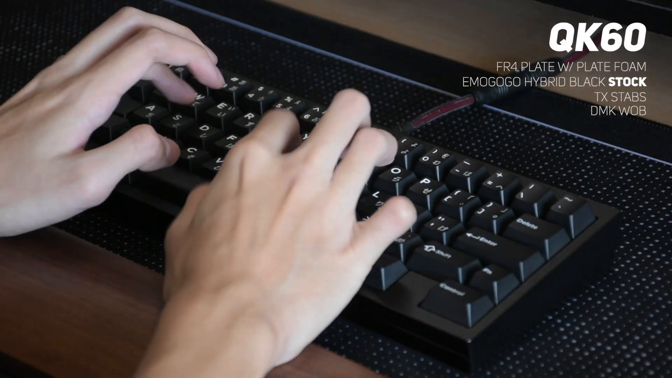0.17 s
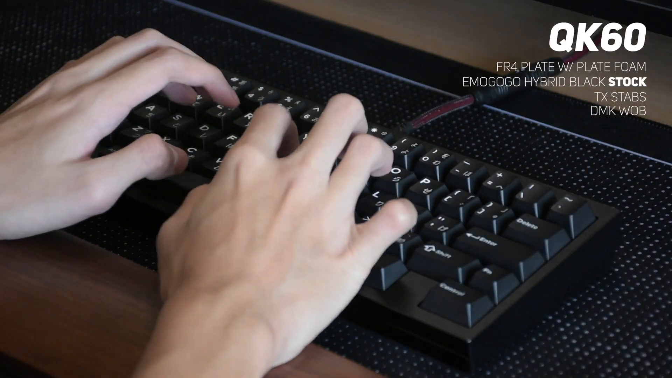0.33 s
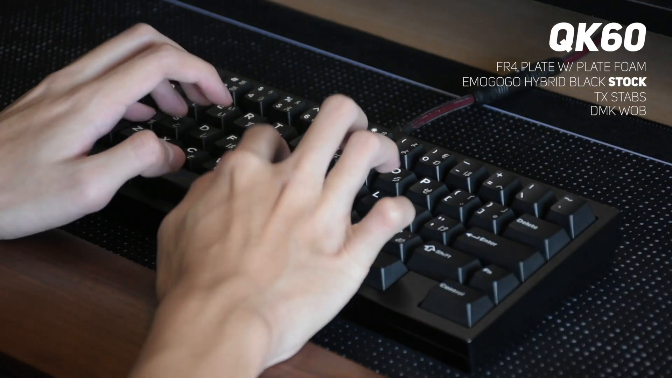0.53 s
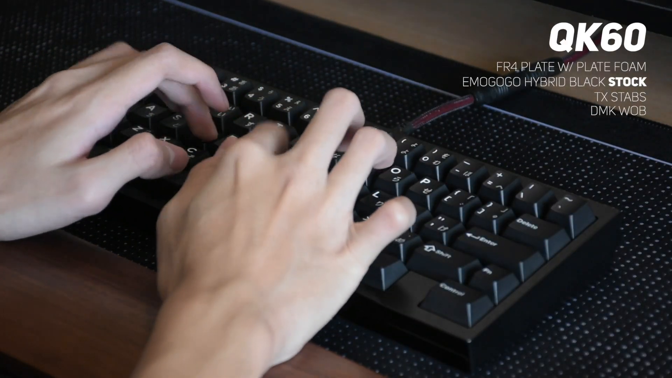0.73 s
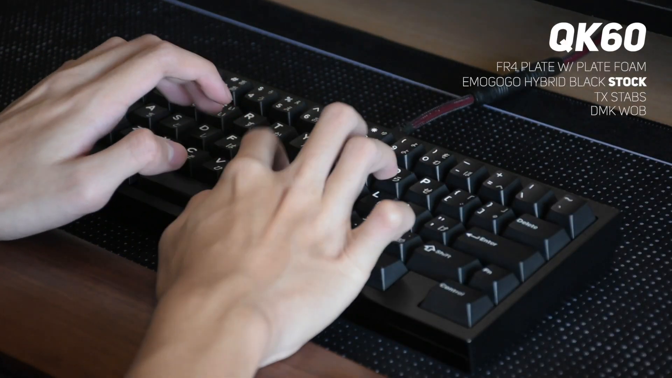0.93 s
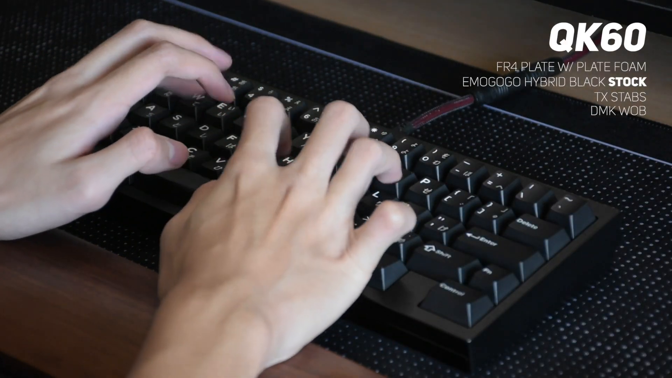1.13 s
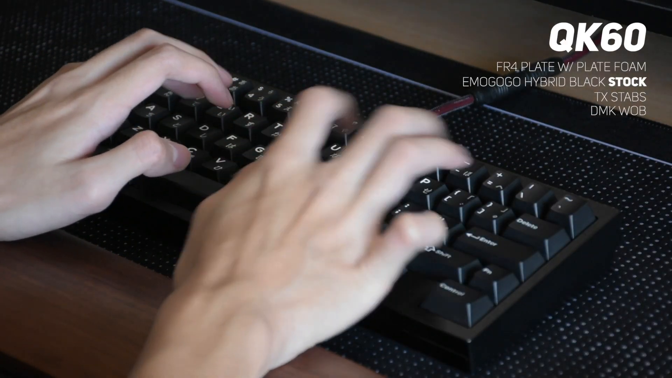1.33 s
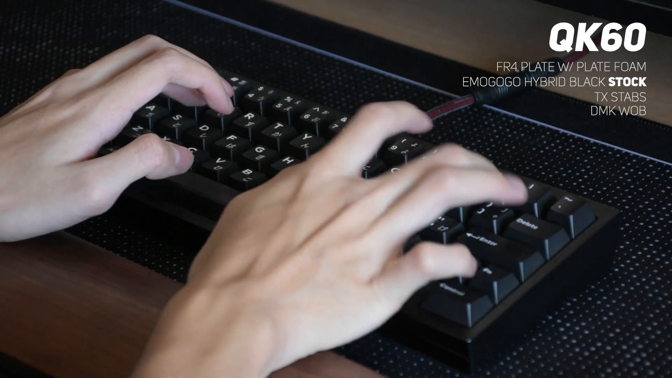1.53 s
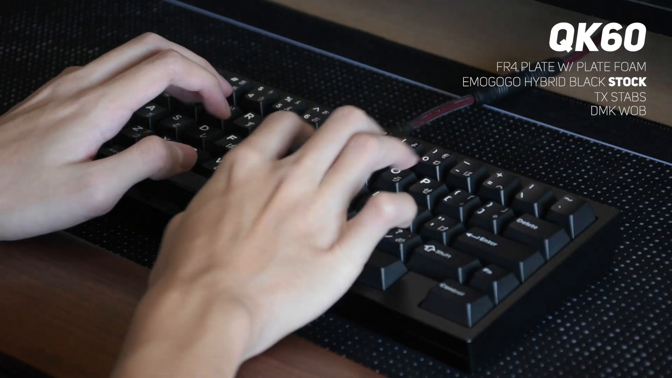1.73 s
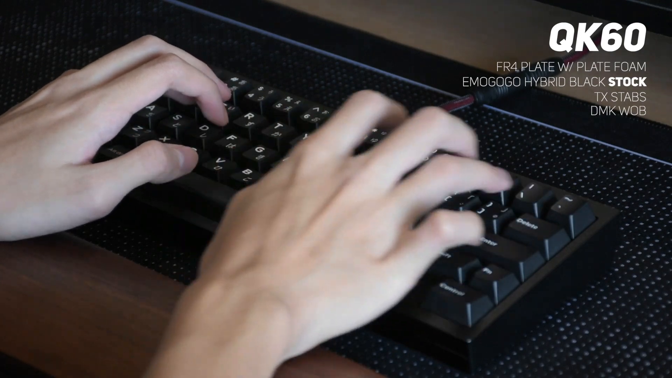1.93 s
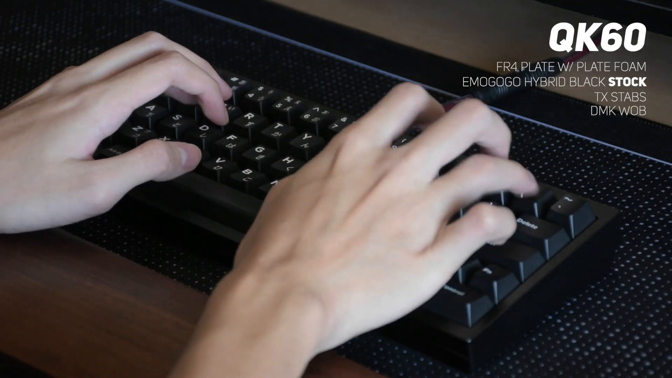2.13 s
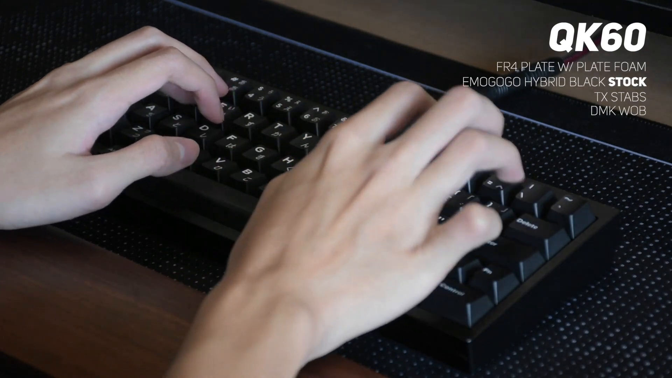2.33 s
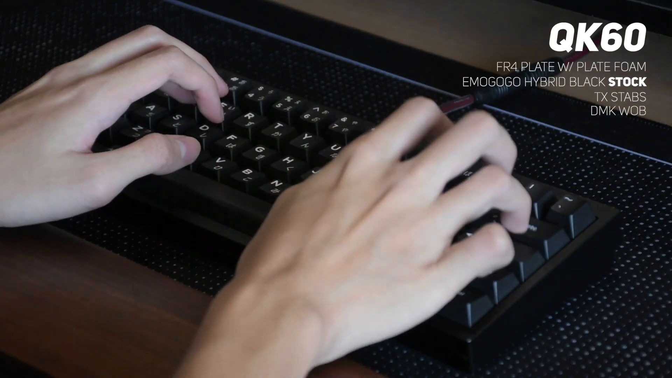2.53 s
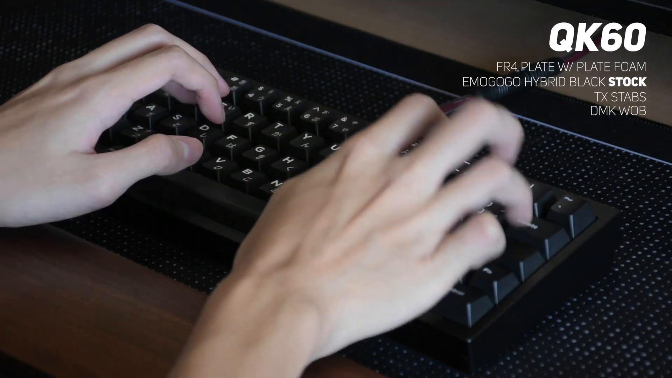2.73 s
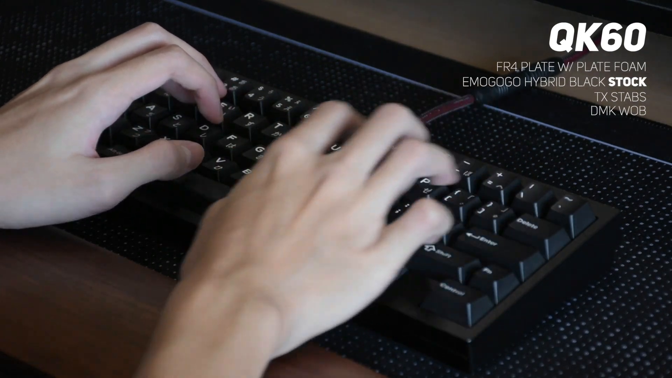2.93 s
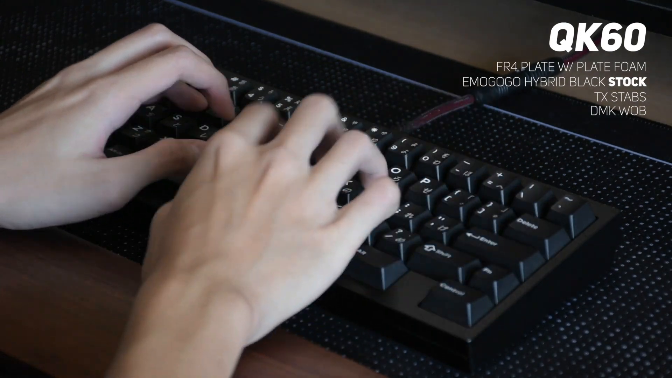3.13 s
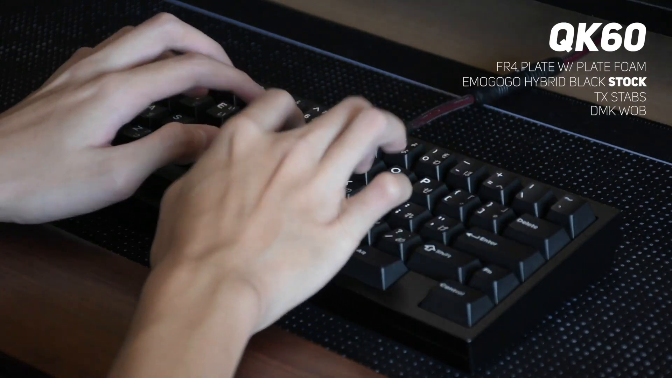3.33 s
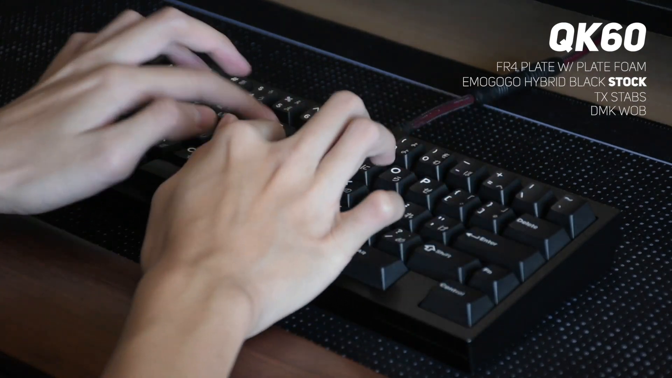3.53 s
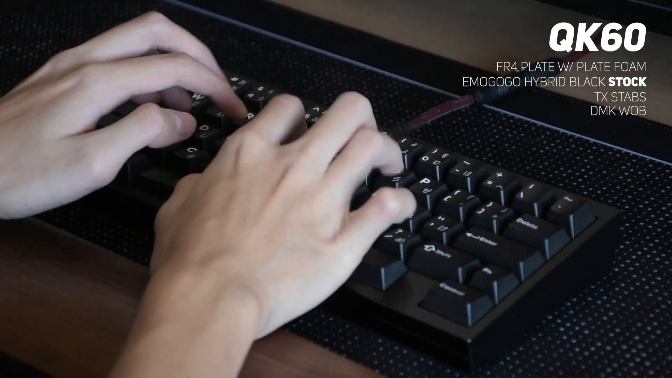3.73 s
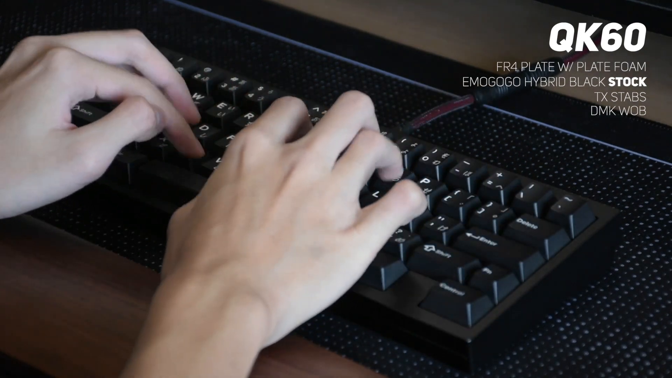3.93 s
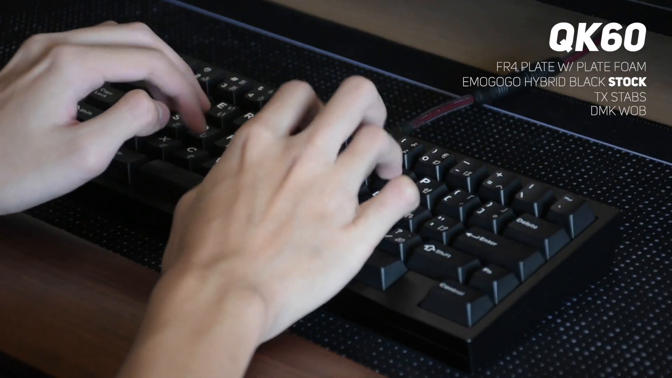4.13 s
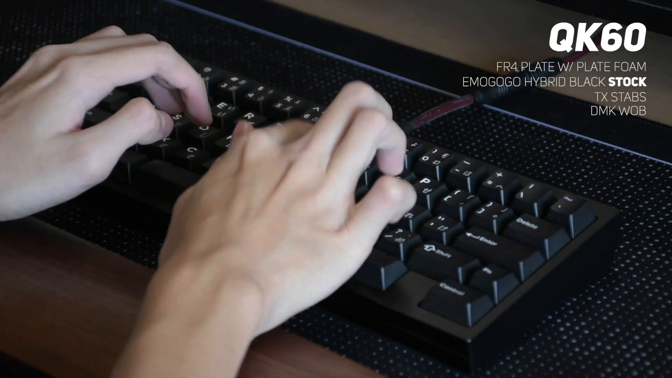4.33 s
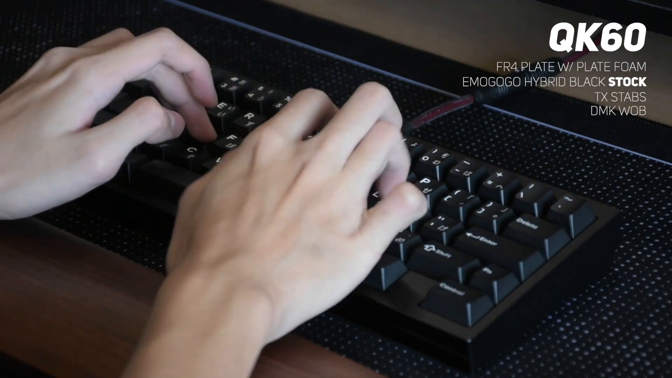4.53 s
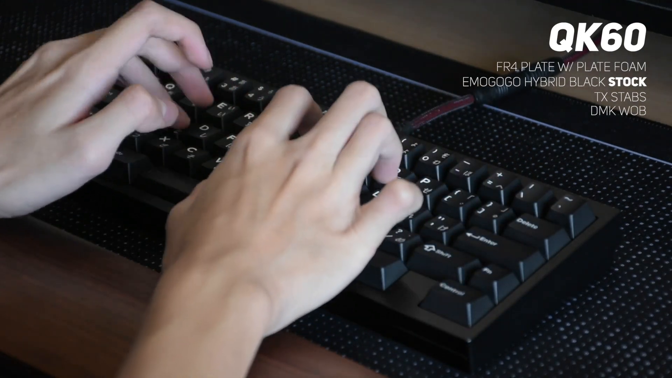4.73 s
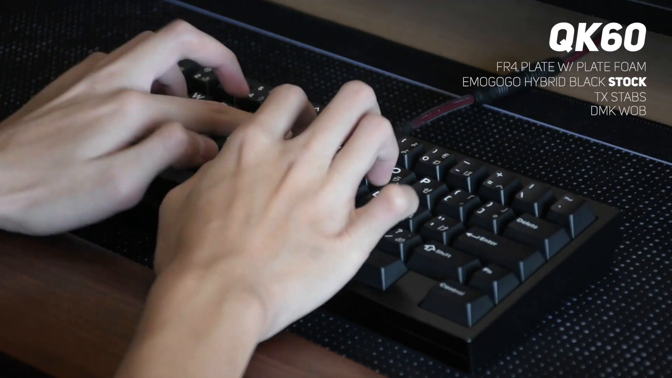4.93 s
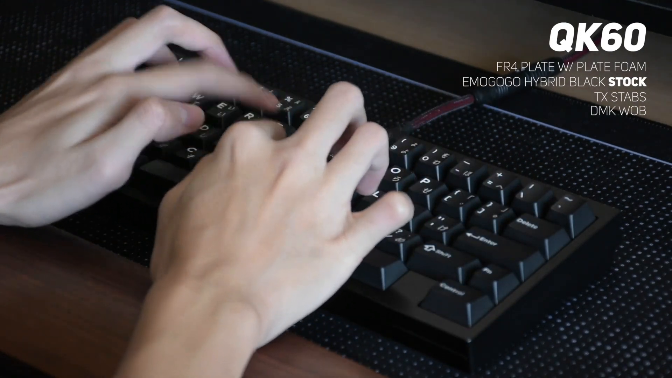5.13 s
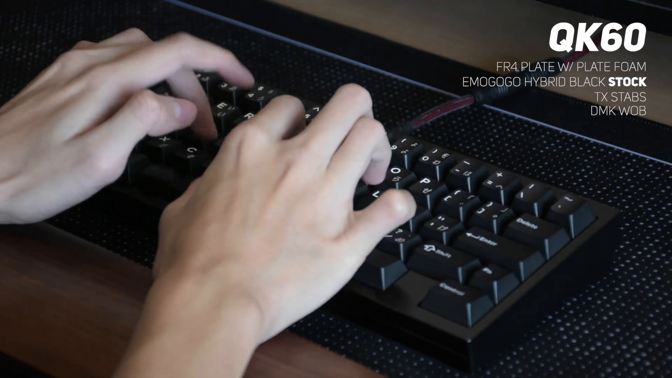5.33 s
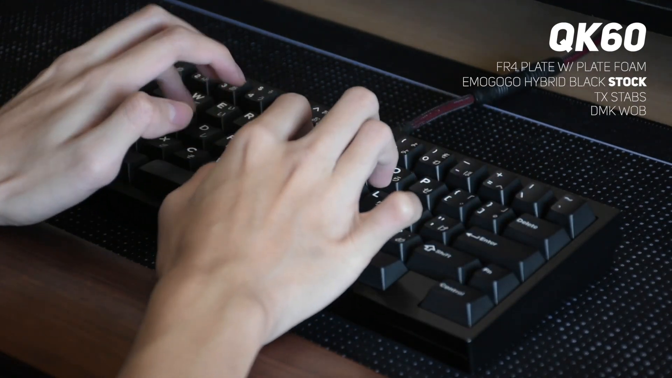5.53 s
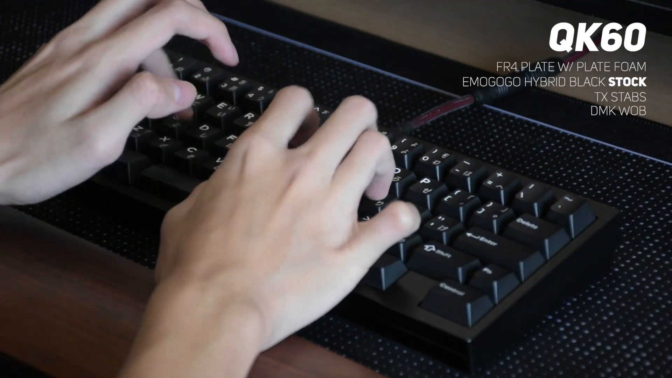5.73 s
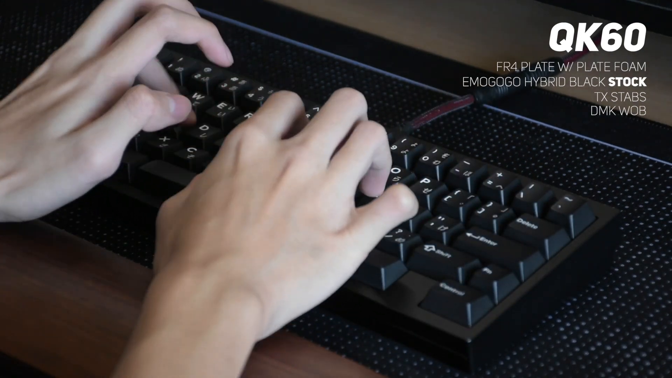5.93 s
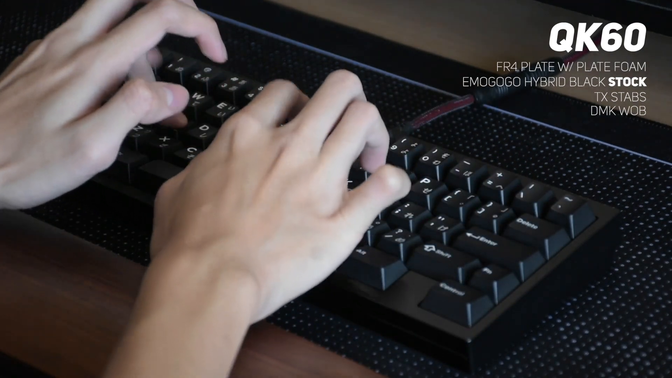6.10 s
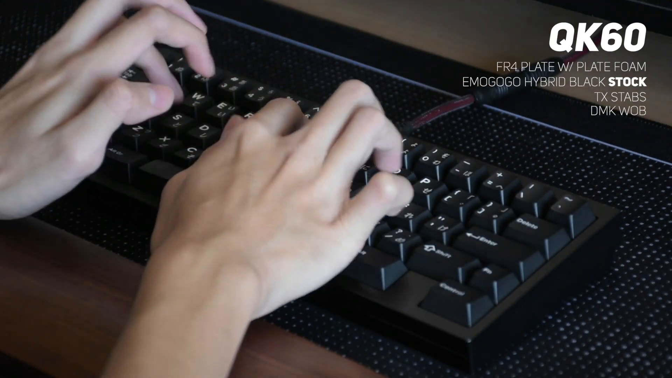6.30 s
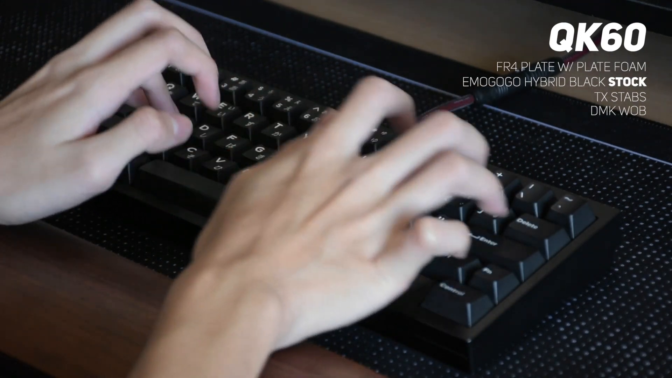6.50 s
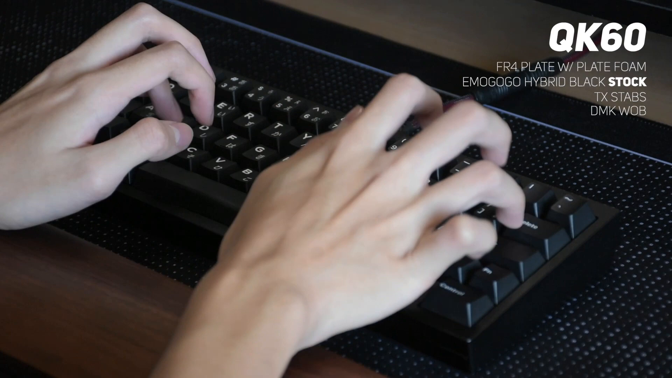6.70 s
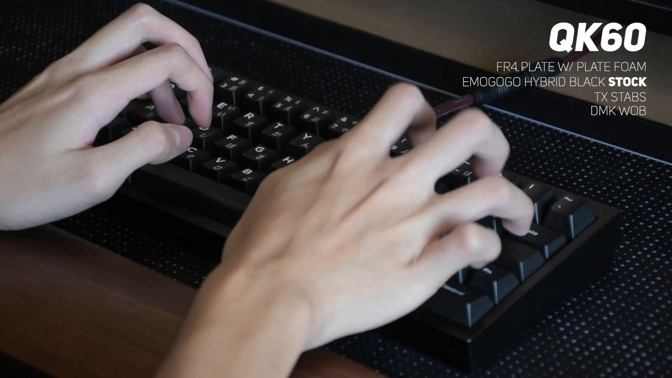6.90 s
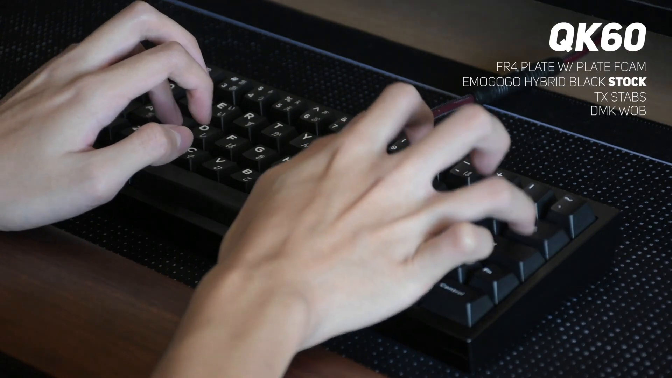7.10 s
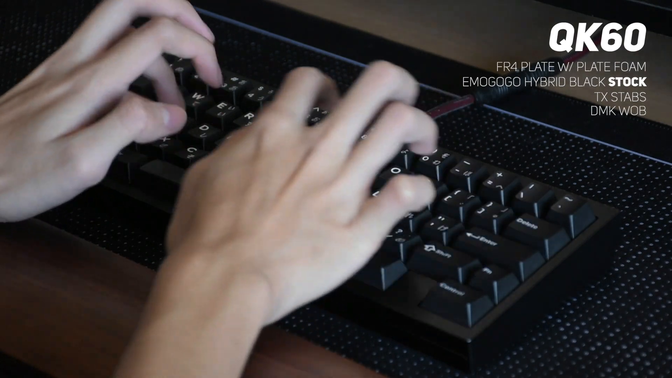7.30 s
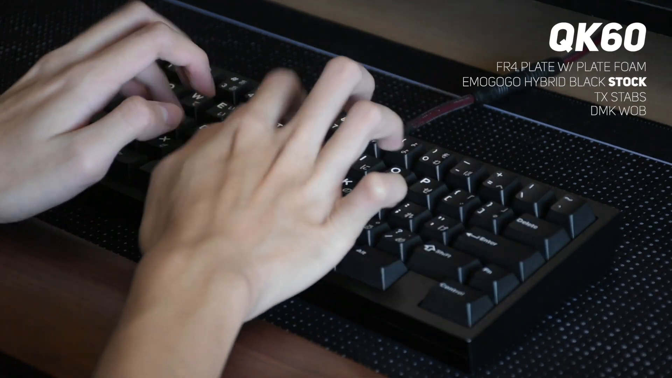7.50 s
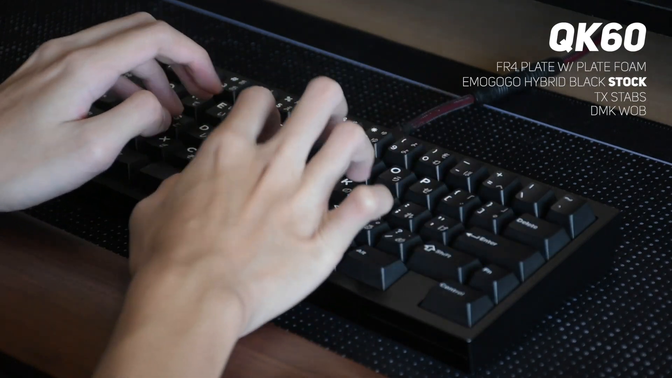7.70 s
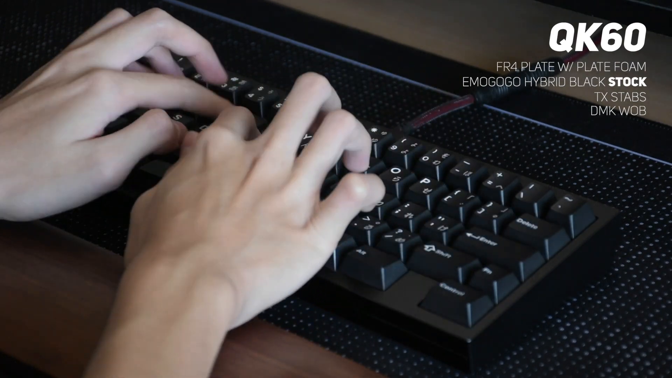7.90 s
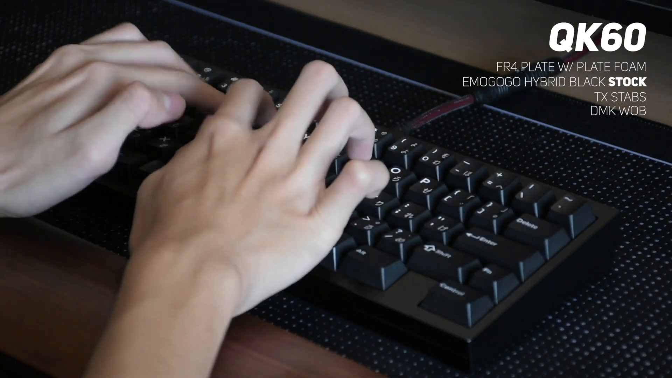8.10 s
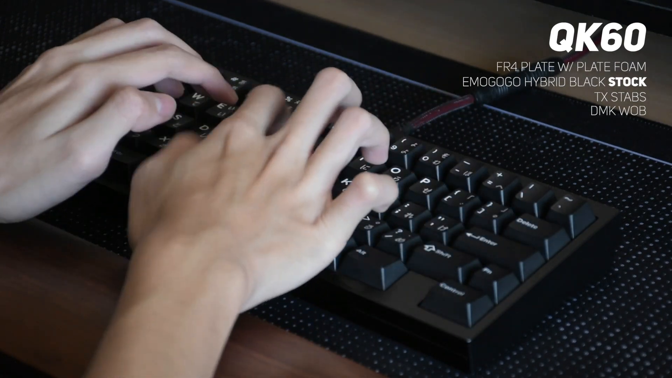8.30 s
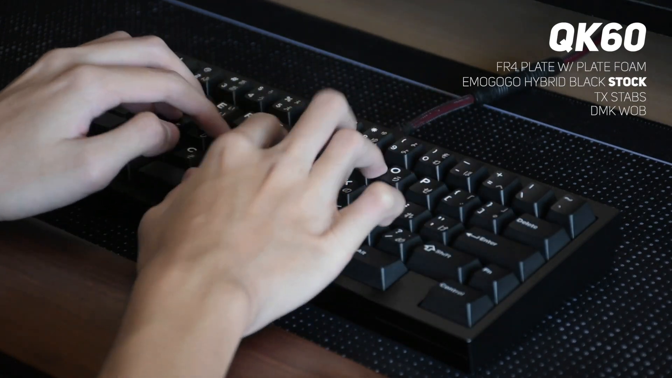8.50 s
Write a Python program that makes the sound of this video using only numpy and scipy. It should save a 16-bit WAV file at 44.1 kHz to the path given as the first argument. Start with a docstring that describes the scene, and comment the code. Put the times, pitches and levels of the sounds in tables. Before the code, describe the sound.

A mechanical keyboard on a matted wooden desk is typed on at close range. Each key gives a short dry clack with a hollow case knock and tiny switch tick, then a lighter return click. Rapid clusters alternate with brief gaps and evenly repeated, lower long-key taps. The space bar lands loudest and deepest. The desk hums softly under the blows, with a short room tail and barely audible air noise.

```python
"""Mechanical keyboard on a wooden desk

Someone types on a mechanical keyboard that lies on a mat, close to the microphone in a small quiet room.
Each key knocks when it bottoms out and when it springs back: the case thocks, the cap clacks, the switch ticks,
each a bank of ringing modes in a haze of noise. The long keys ring lower and hollower, fingertips pat the caps.
The desk's own modes thump and sway with a deep hum; a wall echo, a diffuse tail, hiss and a fan hum surround it."""
import sys
import numpy as np
from scipy import signal
from scipy.fft import rfft, irfft
from scipy.io import wavfile
from scipy.ndimage import uniform_filter1d

SR = 44100
rng = np.random.default_rng(int(sys.argv[2]) if len(sys.argv) > 2 else 0)


def transcribe(signal):
    """Save signal, clipped to [-1, 1], as a 16-bit WAV file at the path in sys.argv[1]."""
    frames = np.atleast_2d(signal).T
    limited = np.clip(frames, -1, 1)
    pcm = np.round(limited * 32767).astype(np.int16)
    wavfile.write(sys.argv[1], SR, pcm)


N = 377055


def from_db(db):
    """Decibels to gain."""
    return 10 ** (np.asarray(db) / 20)


def unit_energy(x):
    """Scale so that the squares sum to one."""
    return x / np.sqrt(np.sum(x ** 2) + 1e-20)


def low_pass(x, top_hz, order):
    """Causal low-pass."""
    return signal.sosfilt(signal.butter(order, top_hz, fs=SR, output="sos"), x)


def band(x, low_hz, high_hz, order=2):
    """Causal band-pass."""
    return signal.sosfilt(signal.butter(order, [low_hz, high_hz], "band", fs=SR, output="sos"), x)


def at_hz(points, hz, column=1):
    """Read a column of a table along log frequency."""
    points = np.array(points)
    return np.interp(np.log(np.maximum(hz, 1)), np.log(points[:, 0]), points[:, column])


def ring(clicks, hz, t60_s):
    """A damped resonance: a unit click sets a decaying sine of height 1 ringing."""
    radius = from_db(-60 / (t60_s * SR))
    angle = 2 * np.pi * hz / SR
    feedback = [1, -2 * radius * np.cos(angle), radius ** 2]
    return signal.lfilter([0, np.sin(angle)], feedback, clicks + 1e-18)


def add(out, start_s, sound):
    """Mix a sound in at a time."""
    start = max(round(start_s * SR), 0)
    out[start:start + len(sound)] += sound[:N - start]


# a usual letter stroke; the case's thock grows a little more slowly than the clack (dB per dB)
USUAL_CLACK_DB, USUAL_THOCK_DB, THOCK_FOLLOWS = -20, -33, 0.72
# a light touch on a cap: its tick relative to its clack, and its pitch
TOUCH_TICK_DB, TOUCH_HZ = -17.5, 2720
# centre modes of a letter key, relative levels: pitch_hz [Hz], level_db [dB], t60_s [s]
LETTER_MODES = [(720, -16.5, 0.01), (1092, 9, 0.009), (1360, 3.5, 0.025), (1550, 7.5, 0.012),
                (2130, -9, 0.0033), (2380, 35.5, 0.0086), (2795, 28, 0.0098), (2800, -10.5, 0.017),
                (3500, -44, .006), (6660, -6, 0.0022), (9200, 16, 0.0004), (10320, 5, 0.0011),
                (13200, -23, 0.0039)]
# letter key contacts: landings, springbacks, and the louder touches of fingers meeting a cap just before a
# stroke: start_s [s], clack_db [dB energy], tick_db [dB energy], pitch_hz [Hz]
LETTER_HITS = [(0.0709, -29, -54, 2610), (0.0875, -13.5, -26, 2730), (0.1844, -22, -36.5, 2820),
               (0.1864, -28.5, -43, 2640), (0.4712, -34.5, -50, 2900), (0.4872, -17, -34, 2650),
               (0.5912, -19, -39, 2670), (0.6714, -39, -45, 3000), (0.7095, -23, -44.5, 2580),
               (0.7169, -28, -49, 2720), (0.7817, -33, -42.5, 2720), (0.8063, -21, -38, 2630),
               (0.8104, -21, -38, 2580), (0.9117, -19.5, -39, 2660), (0.9825, -28.5, -42, 3200),
               (0.9979, -14, -29.5, 2720), (1.0723, -34, -53, 2760), (1.1157, -16, -34, 2540),
               (1.3356, -38.5, -63, 2800), (3.0824, -32, -55, 2660), (3.1506, -36, -54, 3020),
               (3.1814, -15.5, -41.5, 2630), (3.27, -31, -53, 2660), (3.2792, -34, -51, 2730),
               (3.2931, -14, -34, 2450), (3.3833, -17.5, -38.5, 2400), (3.3862, -20.5, -48, 2670),
               (3.4643, -34, -51, 2770), (3.482, -28, -52, 2510), (3.5516, -20.5, -37, 2640),
               (3.5609, -13.5, -31, 2950), (3.6712, -31, -40.5, 2720), (3.6746, -24.5, -48, 2840),
               (4.0194, -16.5, -41, 2680), (4.0923, -13.5, -34.5, 2570), (4.1097, -24.5, -41, 2540),
               (4.171, -17.5, -37.5, 2650), (4.322, -4, -25.5, 2710), (4.4178, -28, -43.5, 2630),
               (4.4702, -37, -50, 2640), (4.4929, -31, -58, 2580), (4.5711, -24, -40.5, 2630),
               (4.5901, -17.5, -41, 2650), (4.6743, -28, -42, 2500), (4.7868, -17.5, -44.5, 2610),
               (4.9352, -21.5, -46, 2560), (4.9722, -30, -44, 2640), (4.982, -11.5, -32.5, 2650),
               (5.0842, -21, -39.5, 2710), (5.1348, -23, -51, 2640), (5.184, -34.5, -40, 3050),
               (5.2096, -23, -48, 2630), (5.3015, -21.5, -41, 2650), (5.3043, -34, -41.5, 2690),
               (5.3279, -19, -45, 2580), (5.4937, -29, -38, 2730), (5.5195, -17.5, -33, 2820),
               (5.635, -14, -28.5, 2640), (5.6531, -17.5, -35, 2370), (5.7743, -22, -48, 2570),
               (5.9414, -31.5, -43, 2350), (6.0072, -26, -46, 2470), (6.0147, -22, -45, 2280),
               (6.2267, -25.5, -40, 2380), (6.2503, -17.5, -32.5, 2650), (6.3616, -31, -48, 2540),
               (6.3831, -20.5, -39.5, 2550), (7.1572, -17, -42.5, 2450), (7.1937, -31.5, -41, 2780),
               (7.2247, -18, -33, 2650), (7.2851, -28.5, -49, 2380), (7.3611, -29, -51, 2670),
               (7.4393, -9.5, -31.5, 2530), (7.5039, -13, -31, 2550), (7.8833, -32.5, -47, 3030),
               (7.8966, -18, -40, 2560), (7.9729, -26.5, -50, 2660), (8.0047, -7, -24, 2470),
               (8.1176, -28, -43.5, 2420), (8.1603, -24, -48, 2530), (8.2123, -20, -36, 2580),
               (8.3, -22.5, -42, 2580), (8.4987, -23.5, -42, 2620), (8.5013, -24, -48, 2890)]
# a finger meets or leaves a cap without pressing it home: start_s [s], clack_db [dB energy]
TOUCHES = [(0.569, -37), (1.47, -39), (2.061, -49), (2.215, -41), (4.312, -46), (4.559, -37.5),
           (5.382, -39.5), (5.613, -37.5), (5.902, -42.5), (5.911, -47), (6.05, -43), (7.057, -45.5),
           (7.43, -32), (7.552, -42), (7.609, -36.5), (7.997, -30.5), (8.125, -38)]


def letter_keys():
    """Letter strokes and light touches: the case answers each in step with its clack."""
    touches = [(s, clack_db, clack_db + TOUCH_TICK_DB, TOUCH_HZ) for s, clack_db in TOUCHES]
    contacts = []
    for s, clack_db, tick_db, pitch_hz in [*LETTER_HITS, *touches]:
        thock_db = USUAL_THOCK_DB + THOCK_FOLLOWS * (clack_db - USUAL_CLACK_DB)
        contacts.append((s, thock_db, clack_db, tick_db, pitch_hz))
    return contacts, keys(contacts, LETTER_MODES, far_end=0.25)


# centre modes of the space bar, relative levels: pitch_hz [Hz], level_db [dB], t60_s [s]
SPACE_MODES = [(396, -13.5, 0.019), (940, -20, 0.0099), (1253, -1.5, 0.012), (1457, 2.5, 0.013),
               (1550, -5, 0.0095), (1840, -14, 0.029), (2540, 14.5, 0.014), (2720, 2.5, 0.031),
               (3100, 17.5, 0.0067), (3520, 1, 0.019), (6730, 0.5, 0.01), (8350, -18, 0.0097),
               (9760, -4.5, 0.009), (12000, 0, 0.0077)]
# space bar landing and springing back: start_s [s], thock_db [dB energy], clack_db [dB energy]
SPACE_HITS = [(0.2463, -16, -24.5), (0.3891, -46.5, -67), (0.9532, -36, -54), (3.7434, -15, -24.5),
              (3.9068, -46.5, -55), (4.7162, -15, -21.5), (4.8757, -34, -45), (5.4118, -20, -37),
              (5.4154, -31.5, -26), (5.5481, -33, -49), (5.8125, -28.5, -59), (5.9873, -40, -40.5),
              (7.627, -10, -15.5), (7.7531, -27.5, -35), (8.3796, -16, -24)]


def space_bar():
    """The space bar's contacts excite its own set of long-key modes."""
    contacts = long_key_contacts(SPACE_HITS, tick_db=-16.5, pitch_hz=2650)
    return contacts, keys(contacts, SPACE_MODES, far_end=0.43)


# centre modes of the backspace key, relative levels: pitch_hz [Hz], level_db [dB], t60_s [s]
BACKSPACE_MODES = [(922, 5, 0.023), (1170, -2, 0.055), (1450, 17.5, 0.017), (1630, 9, 0.015),
                   (2450, 3, 0.011), (2620, -7, 0.0061), (3200, -3, 0.006), (3700, -13, 0.0021),
                   (6240, -7, 0.0032), (6980, -4, 0.011), (7870, -9.5, 0.014), (13100, -10.5, .004)]
# contacts of the backspace key: start_s [s], thock_db [dB energy], clack_db [dB energy]
BACKSPACE_HITS = [(2.4536, -18.5, -10.5), (2.5277, -27.5, -28.5), (2.5314, -33.5, -47),
                  (2.6211, -28.5, -21.5), (2.6817, -27, -29.5), (2.722, -24.5, -17), (2.7791, -22, -23.5),
                  (6.6044, -45.5, -45.5), (6.6414, -25.5, -21), (6.7135, -30.5, -38),
                  (6.7157, -39.5, -35.5), (6.8008, -38.5, -33.5), (6.8549, -32.5, -34),
                  (6.9197, -26, -21.5), (7.0035, -30.5, -35.5), (7.0056, -42, -49), (7.0787, -29, -22),
                  (7.1408, -29, -33), (7.1428, -37, -32)]


def backspace_key():
    """The backspace key's contacts excite its own set of long-key modes."""
    contacts = long_key_contacts(BACKSPACE_HITS, tick_db=-9.0, pitch_hz=2640)
    return contacts, keys(contacts, BACKSPACE_MODES, far_end=0.4)


# centre modes of the enter key, relative levels: pitch_hz [Hz], level_db [dB], t60_s [s]
ENTER_MODES = [(840, -7, 0.009), (1130, -7, 0.0084), (1510, -3.5, 0.021), (1650, -2.5, 0.028),
               (2230, 6, 0.03), (2580, 12, 0.0061), (3020, 20.5, 0.01), (3340, -50, 0.01), (5970, 1, .006),
               (7000, -4, 0.0064), (8000, 3, 0.007), (12040, 13.5, 0.0064)]
# contacts of the enter key: start_s [s], thock_db [dB energy], clack_db [dB energy]
ENTER_HITS = [(1.4813, -24, -18.5), (1.5026, -34, -37), (1.5481, -19.5, -18.5), (1.5775, -40.5, -39),
              (2.0954, -33.5, -28), (2.1529, -37, -31), (2.2612, -39.5, -34.5)]


def enter_key():
    """The enter key's contacts excite its own set of long-key modes."""
    contacts = long_key_contacts(ENTER_HITS, tick_db=-8.5, pitch_hz=2720)
    return contacts, keys(contacts, ENTER_MODES, far_end=0.98)


def long_key_contacts(hits, tick_db, pitch_hz):
    """A long key keeps one pitch setting, and its switch ticks in step with thock and clack."""
    return [(s, thock_db, clack_db, (thock_db + clack_db) / 2 + tick_db, pitch_hz)
            for s, thock_db, clack_db in hits]


CAP_PITCH_HZ = 2630  # reference for the clack pitch of each contact
DETUNE, SPREAD_DB = .015, 2.5  # scatter of the modes at each contact: relative pitch, strength in dB
BLUR_LAG_S = .006  # the sound spreads through the case before it leaves on all sides
# the three voices of a key, case, cap and switch: low_hz [Hz], high_hz [Hz]
VOICES = [(280, 1950), (1950, 4250), (5600, 14000)]
# where the many small modes of case, cap and switch lie: low_hz [Hz], high_hz [Hz]
HAZE_BANDS = [(950, 2890), (2150, 3170), (6000, 8350)]
# haze in the all-round sound, one value each for case, cap and switch: level_db [dB]
ALL_ROUND_HAZE_DB = (3.5, -5, -40)


def keys(contacts, modes, far_end, haze_db=(-12.0, -10.0, -4.0), haze_t60_s=(.03, .016, .014),
         slide_db=(-37.0, -34.0, -28.0), slide_s=0.02):
    """Each contact rings the key's main modes and a haze of small ones; returns forward and all-round sound."""
    forward, all_round = np.zeros((2, N))
    mode_hz, mode_db, mode_t60_s = np.transpose(modes)
    for s, *levels_db, pitch_hz in contacts:
        clack_db = levels_db[1]
        force = contact_force(rebound(clack_db), far_end)
        push = np.diff(force, prepend=0)  # small parts radiate their acceleration
        t = np.arange(len(push)) / SR
        hz = mode_hz * (1 + DETUNE * rng.standard_normal(len(modes)))
        strength = mode_strengths(mode_hz, mode_db, clack_db)
        friction = 2 * rng.random()  # some strokes rub more than others
        tunings = (1, pitch_hz / CAP_PITCH_HZ, 1)  # only the cap's modes follow the contact's pitch
        for v, (low_hz, high_hz) in enumerate(VOICES):
            own = np.flatnonzero((mode_hz >= low_hz) & (mode_hz < high_hz))
            main = sum(strength[k] * ring(push, hz[k] * tunings[v], mode_t60_s[k]) for k in own)
            main = unit_energy(band(main, low_hz, high_hz, order=3))

            grain, rub = rng.standard_normal((2, len(t)))
            grain = grain * from_db(-60 * t / haze_t60_s[v])
            rub = rub * np.exp(-(2 * t / slide_s - 1) ** 4)
            click = t == 0
            haze, slide, blur = map(unit_energy, band([grain, rub, click], *HAZE_BANDS[v]))

            gain = from_db(levels_db[v])
            # the stem slides before it lands
            add(forward, s - slide_s, gain * friction * from_db(slide_db[v]) * slide)
            add(forward, s, gain * unit_energy(main + from_db(haze_db[v]) * haze))
            # summed over all directions, the modes blur into a broad band
            add(all_round, s, gain * main / 2)
            add(all_round, s + BLUR_LAG_S, gain * from_db(ALL_ROUND_HAZE_DB[v]) * blur / 2)
    return forward, all_round


def mode_strengths(mode_hz, mode_db, clack_db, brighten=0.06):
    """Each contact excites the modes differently; hard blows favour the higher modes of the cap."""
    hardness = max(clack_db + 30.0, 0)
    cap_top_hz = VOICES[1][1]  # the tilt rises no further above this
    tilt = (np.minimum(mode_hz, cap_top_hz) / CAP_PITCH_HZ) ** (brighten * hardness)
    scattered_db = mode_db + SPREAD_DB * rng.standard_normal(len(mode_hz))
    return tilt * from_db(scattered_db) / mode_hz


def contact_force(rebound_db, far_end, rebound_s=(.0016, .004), far_end_s=(.0007, .0011), size=2048):
    """Force of one contact: a sharp knock and a rebound; the far edge of the cap lands just after."""
    force = np.zeros(size)
    force[0] = 1
    force[int(SR * np.interp(rng.random(), [0, 1], far_end_s))] += far_end * rng.random()
    force[int(SR * np.interp(rng.random(), [0, 1], rebound_s))] += from_db(rebound_db)
    return force


# rebound of a usual stroke, its fall (dB per dB of clack) and its scatter
REBOUND_DB, REBOUND_FALL, REBOUND_SPREAD_DB = -14, 0.58, 3.5


def rebound(clack_db):
    """Rebound strength in dB: soft contacts chatter, hard ones land clean."""
    usual_db = REBOUND_DB - REBOUND_FALL * (clack_db - USUAL_CLACK_DB)
    return min(usual_db + REBOUND_SPREAD_DB * rng.standard_normal(), 0)


# fingertips settling softly on the caps: start_s [s], level_db [dB peak, before the common trim]
PATS = [(0.153, -56), (3.947, -59.5), (3.995, -59), (4.144, -58), (4.387, -62), (4.534, -68), (4.581, -57),
        (5.259, -55.5), (7.207, -58)]


def pats(low_hz=250, high_hz=900, fade_s=0.0041, trim_db=-0.5, size=1024):
    """Soft skin gives only a short dull knock: a fading burst of band-passed noise."""
    out, t = np.zeros(N), np.arange(size) / SR
    for s, level_db in PATS:
        knock = band(rng.standard_normal(size) * np.exp(-t / fade_s), low_hz, high_hz, order=1)
        add(out, s, from_db(level_db + trim_db) * knock / np.max(np.abs(knock)))
    return out


SWAY_TOP_HZ = 66  # the sway stays below this
# level of the desk's sway under the hands, before the swell: start_s [s], level_db [dB]
SWAY = [(0.0, -45.5), (0.38, -45), (0.43, -42), (0.6, -42.5), (1.33, -46), (1.4, -55), (2.24, -51.5),
        (2.28, -47.5), (2.43, -55.5), (2.52, -36.5), (2.57, -44.5), (3.26, -48), (3.31, -43), (4.02, -42.5),
        (4.05, -40.5), (5.12, -48), (6.0, -43.5), (6.05, -53.5), (6.31, -40), (6.36, -49), (7.26, -42.5),
        (7.33, -52), (7.74, -37), (7.88, -56), (7.95, -41), (8.38, -50.5), (8.45, -45.5), (8.55, -64)]
# two desk modes that beat against each other, relative levels: pitch_hz [Hz], level_db [dB], t60_s [s]
SWAY_MODES = [(54.25, -1.5, 0.48), (59.64, 0, 0.7)]
# other desk modes that each keystroke thumps: pitch_hz [Hz], level_db [dB], t60_s [s]
DESK_MODES = [(36, -69.5, 0.12), (103.2, -66, 0.3), (124.8, -63.5, 0.17)]


def desk(contacts, soft_hz=170, stir=0.015, sway_hz=(50, 65), run_in_size=22050):
    """Keystrokes thump the desk; two modes beat, and swell and sink with the weight of the hands."""
    blows = np.zeros(N)
    for s, thock_db, *_ in contacts:
        blows[round(s * SR)] += from_db(0.68 * (thock_db + 30.5))
    # resting palms stir it too; the run-in lets the modes build up beforehand
    pushes = np.pad(blows, (run_in_size, 0)) + stir * rng.standard_normal(run_in_size + N)
    pushes = low_pass(pushes, soft_hz, order=3)  # the mat softens each blow
    thumps = sum(from_db(db) * ring(pushes, hz, t60_s) for hz, db, t60_s in DESK_MODES)[run_in_size:]

    sway = sum(from_db(db) * ring(pushes, hz, t60_s) for hz, db, t60_s in SWAY_MODES)
    sway = band(sway, *sway_hz)[run_in_size:]
    sway = sway / np.sqrt(uniform_filter1d(sway ** 2, size=4200) + 1e-9)  # level it before shaping
    weight = from_db(np.interp(np.arange(N) / SR, *np.transpose(SWAY)))
    return thumps + low_pass(weight * swell(blows) * sway, SWAY_TOP_HZ, order=8)


def swell(blows, lag_s=0.016, rise_s=0.045, rest=1.0, follows=0.21):
    """After each blow the desk's sway builds up and sinks again; a gain around 1."""
    t = np.arange(SR // 2) / SR - lag_s
    rise_and_fall = np.maximum(t, 0) * np.exp(-np.abs(t) / rise_s)
    drive = np.abs(signal.fftconvolve(blows, rise_and_fall)[:N])
    drive = drive / np.mean(drive) + rest
    return (drive / uniform_filter1d(drive, size=22000)) ** follows


def wall_echo(x, lag_s=0.0088, echo_db=-19.0, cut_hz=4500):
    """The nearest wall returns one dull echo: a delayed, low-passed copy."""
    dull = low_pass(x, cut_hz, order=1)
    return from_db(echo_db) * np.pad(dull, (round(lag_s * SR), 0))[:N]


# the room's reverberation, relative levels: pitch_hz [Hz], level_db [dB], t60_s [s]
ROOM = [(250, 8.5, 1), (632, -5.5, 0.22), (1330, 7.5, 0.29), (2680, -0.5, 0.41), (3940, -1, 0.27),
        (4980, -5, 0.29), (7650, 18, 0.28), (13500, -13, 0.34)]


def room(x, build_s=0.0013):
    """A diffuse tail of decaying noise bands that lingers longest in the bass."""
    t = np.arange(SR // 2) / SR
    edges_hz = np.geomspace(180, 17000, 12)
    white = rng.standard_normal((2, len(t)))
    response = 0
    for k, (low_hz, high_hz) in enumerate(zip(edges_hz, edges_hz[1:])):
        hz = np.sqrt(low_hz * high_hz)
        decay_db = -60 * t / at_hz(ROOM, hz, column=2)
        # neighbouring bands take different noise
        response = response + band(white[k % 2], low_hz, high_hz) * from_db(at_hz(ROOM, hz) + decay_db)
    build_up = 1 - np.exp(-t / build_s)
    return signal.fftconvolve(x, unit_energy(response * build_up))[:N]


AIR_DB = -76.5  # hiss level between 150 Hz and 16 kHz
HUM_HZ, HUM_DB = 252, -84.5
# spectrum of the room's still air, relative levels: pitch_hz [Hz], level_db [dB per Hz]
AIR = [(22, 35.5), (42, 31), (85, 16.5), (130, 3), (200, 5), (500, -5.5), (2500, -12.5), (5000, -16),
       (13000, -21), (16000, -30.5)]


def air():
    """Faint even hiss and rumble from shaped noise, with the hum of a fan as one steady sine."""
    hz = np.arange(N // 2 + 1) * SR / N
    noise = irfft(rfft(rng.standard_normal(N)) * from_db(at_hz(AIR, hz)), N)
    noise = noise / np.std(band(noise, 150, 16000))
    hum = np.sqrt(2) * np.sin(2 * np.pi * HUM_HZ * np.arange(N) / SR)
    return from_db(AIR_DB) * noise + from_db(HUM_DB) * hum


def scene(letter_wet_db=-12.0, space_wet_db=-13.5, backspace_wet_db=-10.5, enter_wet_db=-9.0):
    """Mix keys, desk and room; each kind of key throws its own share of sound into the room."""
    contacts, direct, thrown = [], np.zeros(N), np.zeros(N)
    kinds = [(letter_keys, letter_wet_db), (space_bar, space_wet_db),
             (backspace_key, backspace_wet_db), (enter_key, enter_wet_db)]
    for play, wet_db in kinds:
        key_contacts, (forward, all_round) = play()
        contacts += key_contacts
        direct += forward
        thrown += from_db(wet_db) * all_round
    mix = direct + wall_echo(direct) + room(thrown) + pats() + desk(contacts) + air()
    return mix[None]


CUTOFF_HZ = 16400


def record(dry):
    """A steep elliptic low-pass cuts the top."""
    return signal.sosfilt(signal.ellip(10, .1, 80, CUTOFF_HZ, fs=SR, output="sos"), dry)


dry = scene()
out = record(dry)
transcribe(out)
```